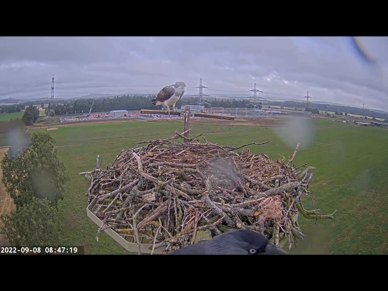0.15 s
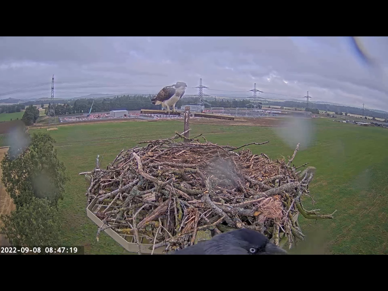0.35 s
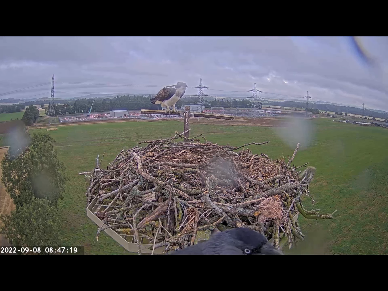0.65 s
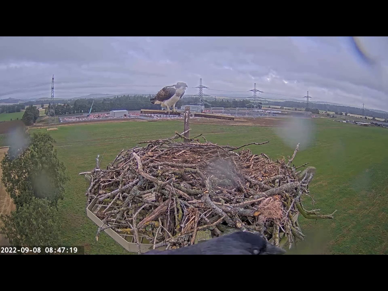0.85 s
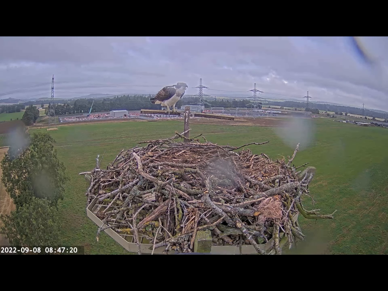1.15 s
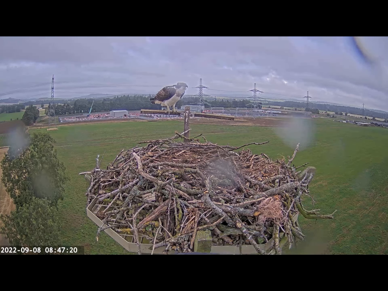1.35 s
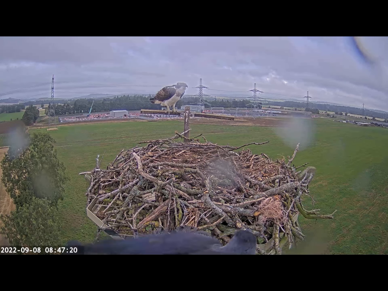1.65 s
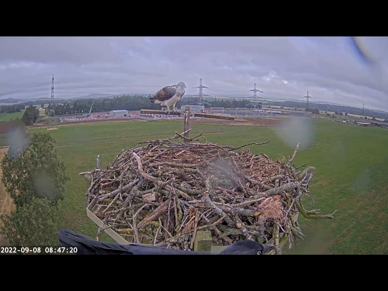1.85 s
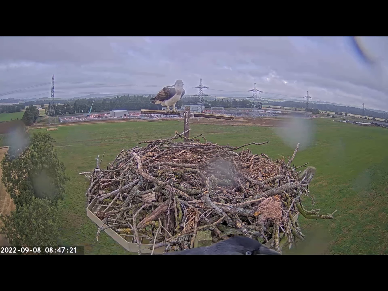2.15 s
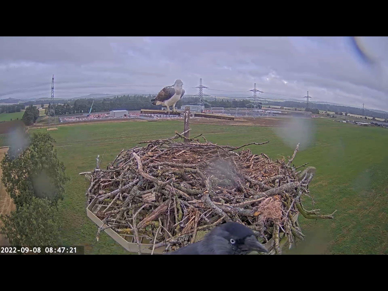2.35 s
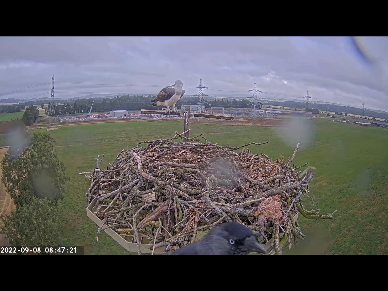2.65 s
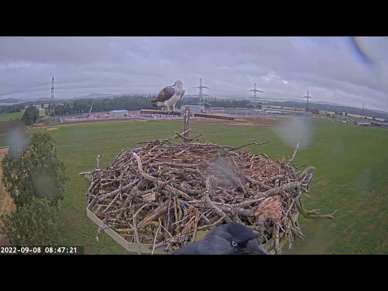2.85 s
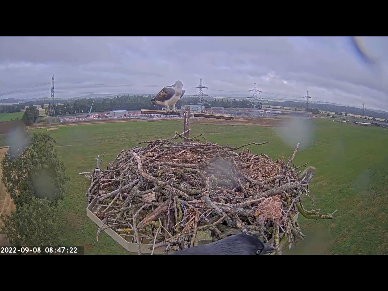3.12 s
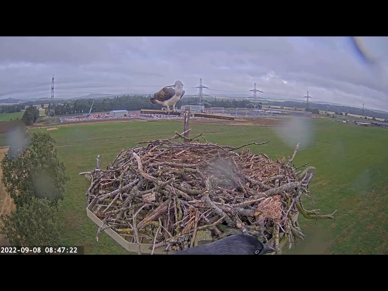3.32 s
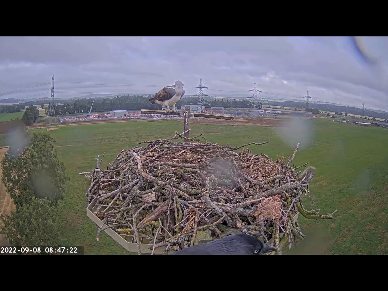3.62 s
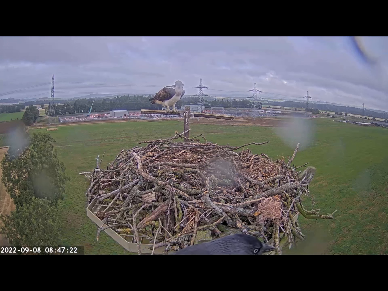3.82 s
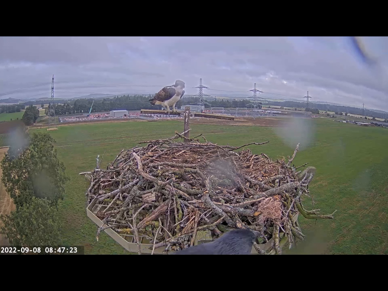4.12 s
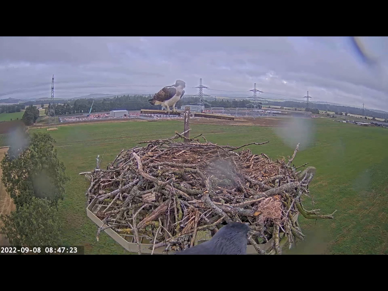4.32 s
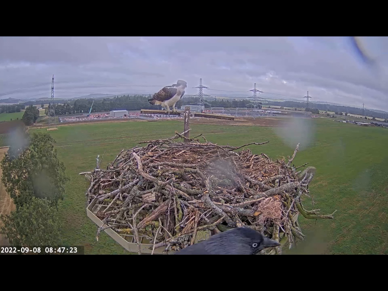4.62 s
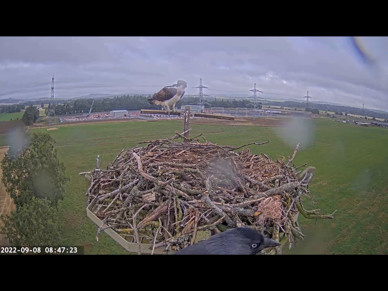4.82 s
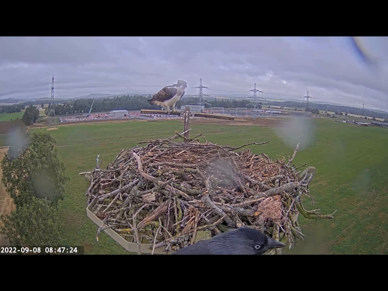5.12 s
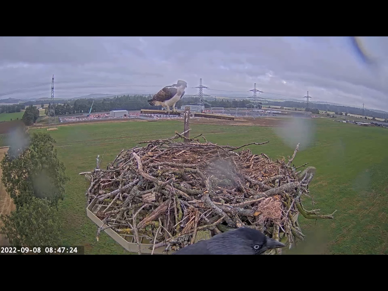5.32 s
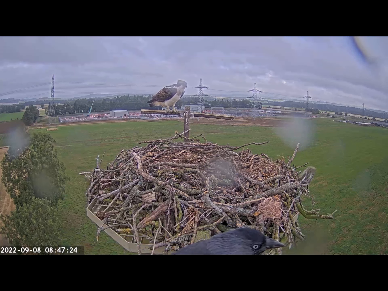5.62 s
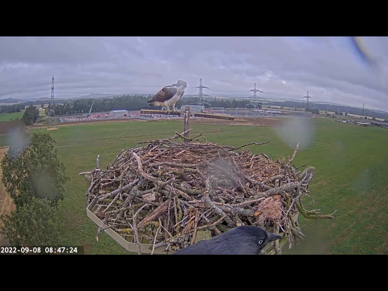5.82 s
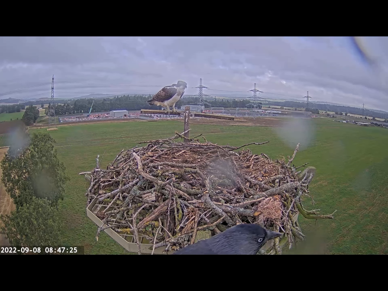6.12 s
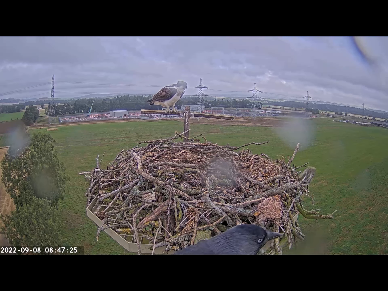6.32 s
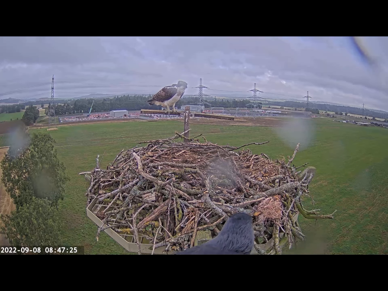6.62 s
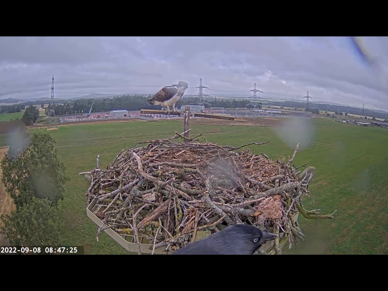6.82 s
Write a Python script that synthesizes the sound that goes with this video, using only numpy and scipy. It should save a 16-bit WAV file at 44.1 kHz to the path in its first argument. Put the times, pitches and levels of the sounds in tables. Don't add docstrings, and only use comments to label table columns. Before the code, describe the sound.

Steady low wind rumble buffets a camera microphone in open air, swelling with slow shoves and hissing faintly through the housing. Over it, a nearby jackdaw gives three widely spaced pairs of very short calls, each a bright, harsh chack followed by a muted lower note. One faint feathery wing stroke follows the first pair, and tiny twig clicks cluster between the second and third.

```python
import sys
import numpy as np
from scipy import signal
from scipy.fft import rfft, irfft, next_fast_len
from scipy.io import wavfile
from scipy.ndimage import uniform_filter1d, minimum_filter1d

SR = 44100
rng = np.random.default_rng(int(sys.argv[2]) if len(sys.argv) > 2 else 0)


def wrap_up_sound(samples):
    columns = np.atleast_2d(samples).T
    tamed = np.clip(columns, -1, 1)
    steps = np.round(tamed * 32767).astype(np.int16)
    wavfile.write(sys.argv[1], SR, steps)


def nominal_scale(level):
    x = np.asarray(level, float) / 20
    return 10 ** x


N = 307136

# (start [s], length [s], first pitch [Hz], sag [Hz/s], effort [dB])
TCHAKS = [
    (0.958, 0.077, 1098, 4255, -24),
    (3.101, 0.072, 1175, 6800, -26),
    (6.669, 0.08, 1234, 7257, -24),
]
# (share of length, effort [dB], beak opening as treble [dB], roughness [0-1])
TCHAK_SHAPE = [
    (0, -6, -5.5, .08),
    (0.111, 0, 0.5, .12),
    (0.339, 0, 0, .13),
    (0.561, -7, 2, .22),
    (.79, -17.5, -3.5, 0.25),
    (.95, -44, -12, 0.15),
]
# (start [s], length [s], pitch [Hz], effort [dB], extra push at the start [dB])
KYOWS = [
    (1.09, .065, 770, -35.5, 11.5),
    (3.259, .069, 832, -33, 1.2),
    (6.897, 0.038, 777, -33, 0.1),
]
# (share of length, share of pitch, effort [dB], beak opening [dB], roughness [0-1])
KYOW_SHAPE = [
    (0, .97, -2, -3.5, .2),
    (0.199, 1.005, 0.7, -3.5, .08),
    (0.468, 1.001, -1.7, -1.5, 0),
    (.67, 0.79, -4, -6.5, .06),
    (.82, 0.66, -15, -5, .08),
    (.999, 0.5, -29.5, -8, .12),
]
# (lowest overtones at the start [dB], at the end [dB], beak opening [dB])
CHEST = [
    (-2, -0.5, -12),
    (0.5, 1, -7),
    (-2.5, -1, -4.5),
    (-13.5, -3, -24.5),
    (-1.5, -3, -19.5),
    (-5, -11, -25),
]
# (time [s], length [s], pitch [Hz], level [dB])
WHISTLES = [
    (1.107, 0.039, 2310, -43.5),
    (3.283, 0.034, 2300, -43.5),
    (6.719, 0.018, 2350, -41.5),
    (6.913, .028, 2100, -57),
    (1.006, .02, 2140, -42),
    (3.14, 0.017, 2476, -49),
]
# (centre [Hz], width [Hz], gain [dB])
THROAT = [(2284, 750, 10), (1710, 230, -3), (2996, 710, -18), (3530, 380, 11.5), (4760, 610, -10),
          (5200, 250, 11.5), (6420, 170, -18.5), (7100, 1000, 6), (8250, 61, -20.5), (8730, 490, -37),
          (9780, 730, -21.5)]
ATTACK_S, RELEASE_S, BEAK_HZ, CHEST_HZ, PUSH_HZ_PER_DB = .0037, .012, 3120, 1790, 2
SHUT_HZ, SHUT_WIDTH_HZ, SHUT_DB = 2074, 130, -18
NEST_DB, NEST_T60_S = -21, .02
ECHO_S, ECHO_DB, ECHO_HZ = .146, -29.5, 4200

# (time [s], hold [s], feather swish [dB], low flap [dB])
WING = [
    (1.722, 0.019, -56, -53),
    (1.754, 0.024, -65.5, -70.5),
    (1.833, 0.028, -74, -69.5),
]
WING_ATTACK_S = (.003, .006, .015)
WING_FADE_DB_PER_S = (708, 112.5, 503)
# (time [s], peak [dB], low body [dB])
TICKS = [(0.4008, -77.5, -3), (0.692, -61, 4.5), (0.8736, -66, 6.5), (2.934, -63, 1), (3.831, -61.5, -1.5),
         (4.1573, -54, -6.5), (4.2786, -61, 2), (4.733, -53.5, -10), (4.751, -65.5, -8.5),
         (4.9105, -52, -4.5), (5.3725, -65.5, -28), (5.8572, -62, -10), (5.881, -60.5, -5),
         (6.0368, -66, 12), (6.196, -71, -8.5)]

# (time [s], peak [dB])
PUFFS = [(0.402, -30.5), (0.478, -26), (0.628, -33), (1.528, -43), (1.64, -34), (2.236, -46), (3.587, -33),
         (4.277, -39), (5.406, -49), (5.898, -30), (6.314, -55), (6.341, -31)]
PUFF_DB, PUFF_RISE_S, PUFF_TAIL_S = 1.5, .0006, .004
# (frequency [Hz], density [dB per Hz])
WIND = [(5, 0.5), (9, 5.5), (16, 2), (28, -6), (43, -8), (97, -18), (270, -30.5), (1000, -45.5),
        (2000, -55), (3500, -71), (5000, -74.5), (9600, -86), (12000, -101)]
# (time [s], level [dB])
GUST = [(0.0, -50), (0.35, -50.5), (0.73, -52.5), (0.93, -54.5), (1.18, -51), (1.3, -51), (1.74, -51),
        (2.02, -57), (2.27, -56.5), (2.64, -51.5), (2.95, -55.5), (3.16, -56.5), (3.33, -53.5),
        (4.03, -49.5), (5.33, -52.5), (6.05, -51), (6.28, -52), (6.96, -53.5)]
# (time [s], length [s], level [dB])
SHOVES = [(0.071, .06, 4.5), (0.295, 0.35, 6), (0.998, 0.11, 7), (1.425, 0.094, 11.5), (2.538, 0.045, 5),
          (2.813, 0.067, 7.5), (3.24, 0.096, 15.5), (3.513, .1, 11), (4.031, 0.054, 3), (4.506, 0.083, 1.5),
          (4.96, 0.084, 6), (5.457, 0.097, 8), (5.941, .06, 5.5), (6.152, 0.037, 6.5), (6.565, .05, 7),
          (6.795, 0.052, 6.5), (6.96, 0.029, -10.5)]
# (time [s], level [dB])
FACING = [(0, -36.5), (1, -37.5), (2.102, -38.5), (2.7, -32.5), (3.1, -34.5), (3.602, -34), (5, -34),
          (6.96, -39)]
GUST_CENTRES_HZ = [15, 70, 220, 700, 3000]
GUST_FOLLOW = [.4, 0.501, .8, 0.951, 1.201]
SHOVE_FOLLOW = [0.92, 0.18, 0.36, 0.092, 0.0052]
FACING_FOLLOW = [0.18, 1, 0.033, 0.013, .01]
SETTLE_S, CRACKLE_DB, CRACKLE_PER_S = .03, 2.8, 160

# (centre [Hz], width [Hz], gain [dB])
HOUSING = [(1050, 400, 2), (1620, 450, -6), (2150, 400, 4), (2530, 180, -7), (2770, 200, 4), (3500, 250, 2),
           (3850, 200, -8), (4200, 300, 3), (4620, 280, -13), (5180, 300, 5), (5480, 150, -6),
           (5800, 150, -4), (6150, 400, 2), (6700, 200, -3), (7900, 200, -4)]
# (frequency [Hz], step over band rms [dB], margin to neighbours for dropping a band [dB])
CAMERA_STEPS = [(300, -20, -20), (900, -6, -8), (1600, 1.5, -4), (3000, 4.5, -2), (6000, 5.5, -1.5),
                (9600, 5, -2)]
HISS_DB, TOP_HZ = -83, 9600


def level(x, db):
    return x * nominal_scale(db) / np.sqrt(np.mean(x ** 2))


def band(x, lo_hz, hi_hz, order=2):
    return signal.sosfilt(signal.butter(order, [lo_hz, hi_hz], "band", fs=SR, output="sos"), x)


def cavities(x, modes):
    for hz, width_hz, db in modes:
        w, a = 2 * np.pi * hz / SR, nominal_scale(db / 2)
        k = np.sin(w) * width_hz / hz / 2
        x = signal.lfilter([1 + k * a, -2 * np.cos(w), 1 - k * a], [1 + k / a, -2 * np.cos(w), 1 - k / a], x)
    return x


def walk(rate_hz, size):
    k = int(SR / rate_hz)
    held = np.repeat(rng.standard_normal(size // k + 1), k)
    return 1.26 * uniform_filter1d(uniform_filter1d(held, k), k)[:size]


def jackdaw():
    voice = np.zeros(N)
    for (s, hz, db, beak_db, rough), (*chest_db, open_db) in zip(call_curves(), CHEST):
        start, sound = call(np.transpose([s, hz, db, beak_db + open_db, rough]), chest_db)
        voice[start:start + len(sound)] += sound
    voice = cavities(voice + whistles(), THROAT)
    t = np.arange(SR // 8) / SR
    scatter = rng.standard_normal((2, len(t))) * np.exp(-np.log(1000) * t / NEST_T60_S)
    scatter /= np.sqrt(np.sum(scatter ** 2, axis=1, keepdims=True))
    sticks = signal.fftconvolve(voice, scatter[0])[:N]
    bright = signal.lfilter(*signal.butter(1, ECHO_HZ, "high", fs=SR), voice)
    far = signal.fftconvolve(bright, scatter[1])
    echo = np.r_[np.zeros(int(ECHO_S * SR)), far][:N]
    return voice + nominal_scale(NEST_DB) * sticks + nominal_scale(ECHO_DB) * echo


def call_curves():
    share, db, beak_db, rough = np.transpose(TCHAK_SHAPE)
    for s, length, hz, sag, effort_db in TCHAKS:
        yield s + share * length, hz - sag * share * length, effort_db + db, beak_db, rough
    share, pitch, db, beak_db, rough = np.transpose(KYOW_SHAPE)
    for s, length, hz, effort_db, push_db in KYOWS:
        push = push_db * np.clip(1 - share, 0, 1)
        pushed_hz = hz * pitch + PUSH_HZ_PER_DB * push * (share == 0)
        yield s + share * length, pushed_hz, effort_db + db + push, beak_db, rough


def call(rows, chest_db):
    s, *columns = np.transpose(rows)
    t = np.arange(s[0] - ATTACK_S, s[-1], 1 / SR)
    hz, db, beak_db, rough = (np.interp(t, s, c) for c in columns)
    rough = np.clip(rough, 0, 1)
    phase = 2 * np.pi * np.cumsum(hz * (1 + 0.17 * rough * walk(900, len(t)))) / SR
    k = np.arange(1, 19)[:, None]
    shut = beak_db < -17
    treble = 1 / (1 + (BEAK_HZ / (k * hz)) ** 14.0)
    chest = 1 / (1 + (k * hz / CHEST_HZ) ** 34.0)
    treble += 0.51 * np.exp(-((k * hz - 4300) / 700) ** 2) * shut
    overtone_db = beak_db * treble + chest * np.linspace(*chest_db, len(t)) - 2.6 * np.log2(k)
    overtones = nominal_scale(overtone_db) * (k * hz < SR / 4)
    overtones *= nominal_scale(SHUT_DB * np.exp(-((k * hz - SHUT_HZ) / SHUT_WIDTH_HZ) ** 2) * shut)
    overtones *= nominal_scale(3.1 * treble * np.array([walk(130, len(t)) for _ in k]))
    tone = np.sum(overtones * np.sin(k * phase), axis=0) * nominal_scale(5.4 * rough * walk(500, len(t)))
    air = rng.standard_normal(len(t)) * (1 + np.cos(phase))
    breath = band(air, 1100, 3000) + nominal_scale(beak_db + 0.5) * band(air, 4500, 11000)
    onset = np.clip((t - t[0]) / ATTACK_S, 0, 1) ** 2
    release = np.clip((t[-1] - t) / RELEASE_S, 0, 1)
    voiced = tone + 1.3 * rough * breath
    return int(t[0] * SR), voiced * nominal_scale(db + 2.0) * onset * release


def whistles():
    out = np.zeros(N)
    for s, length, hz, db in WHISTLES:
        t = np.arange(int(length * SR)) / SR
        swell = np.sin(np.pi * t / length) ** 0.4 * nominal_scale(db + 2.5 * walk(250, len(t)))
        out[int(s * SR):int(s * SR) + len(t)] = swell * np.sin(2 * np.pi * hz * t)
    return out


def wing():
    t, swish, flap = np.arange(N) / SR, 0, 0
    for (s, hold, swish_db, flap_db), attack, fade in zip(WING, WING_ATTACK_S, WING_FADE_DB_PER_S):
        stroke = np.clip((t - s) / attack, 0, 1) * nominal_scale(-fade * np.clip(t - s - hold, 0, 1))
        swish = swish + nominal_scale(swish_db) * stroke
        flap = flap + nominal_scale(flap_db) * stroke
    grain = rng.standard_normal(N) * nominal_scale(1.6 * walk(120, N))
    feathers = level(band(grain, 4700, 7600), 0) * swish
    thump = level(band(grain, 1500, 3400), 0) * flap
    return cavities(feathers + thump, HOUSING)


def ticks():
    out, t = np.zeros(N), np.arange(SR // 50) / SR
    for s, db, body_db in TICKS:
        snap = rng.standard_normal(len(t)) * np.exp(-t / 0.002)
        snap = band(snap, 2600, 7000) + nominal_scale(body_db) * 2 * band(snap, 900, 3000)
        out[int(s * SR):int(s * SR) + len(t)] += nominal_scale(db + 3) * snap
    return cavities(out, HOUSING)


def puffs():
    out, t = np.zeros(N), np.arange(SR // 20) / SR
    for s, db in PUFFS:
        eddy = rng.standard_normal(len(t)) * np.exp(-t / PUFF_TAIL_S) * (1 - np.exp(-t / PUFF_RISE_S))
        out[int(s * SR):int(s * SR) + len(t)] += nominal_scale(db + PUFF_DB) * band(eddy, 560, 1500)
    return cavities(out, HOUSING)


def wind():
    size = next_fast_len(N)
    f, t = np.fft.rfftfreq(size, 1 / SR) + 1e-3, np.arange(N) / SR
    wind_hz, wind_db = np.transpose(WIND)
    shape = nominal_scale(np.interp(np.log(f), np.log(wind_hz), wind_db))
    noise = rfft(rng.standard_normal(size)) * shape * f ** 2 / (f ** 2 + 2.5 ** 2)
    gust, facing = (np.interp(t, *np.transpose(curve)) for curve in (GUST, FACING))
    shove = sum(db * np.exp(-((t[::64] - s) / length) ** 2) for s, length, db in SHOVES).repeat(64)[:N]
    swings = [curve - curve.mean() for curve in (gust, shove, facing)]
    follows = (GUST_FOLLOW, SHOVE_FOLLOW, FACING_FOLLOW)
    out, throb = np.zeros(N), walk(35, N)
    crackle = CRACKLE_DB * np.clip(walk(CRACKLE_PER_S, N) - .5, 0, 3)
    for octave in np.arange(1, 14, .5):
        part = irfft(noise * np.clip(1 - 2 * abs(np.log2(f) - octave), 0, 1), size)[:N]
        slopes = [np.interp(octave, np.log2(GUST_CENTRES_HZ), row) for row in follows]
        gust_db = sum(slope * swing for slope, swing in zip(slopes, swings))
        throb_db = 1.8 * np.clip((octave - 7.5) / 5.6, 0, 1) * throb
        crackle_db = (8 < octave < 11.6) * crackle
        out += part * nominal_scale(gust_db + throb_db + crackle_db + 1.3 * walk(16, N))
    return level(cavities(out - out[0] * np.exp(-t / SETTLE_S), HOUSING), -22.0)


def camera_rounding(x, size=1024, count=8):
    n, k = np.arange(2 * size), np.arange(size // 2)
    window = np.sin(np.pi * (n[:, None] + .5) / (2 * size))
    basis = np.cos(np.pi / size * np.outer(n + .5 + size / 2, k + .5)) * window
    padded = np.pad(x, (size, 2 * size - len(x) % size), "reflect").reshape(-1, size)
    lines = (np.hstack([padded[:-1], padded[1:]]) @ basis).reshape(len(padded) - 1, -1, count)
    hz = (np.arange(lines.shape[1]) + .5) * count * SR / (2 * size)
    table_hz, *columns = np.transpose(CAMERA_STEPS)
    step_db, drop_db = (np.interp(np.log(hz), np.log(table_hz), c) for c in columns)
    db = 10 * np.log10(np.mean(lines ** 2, axis=2) + 1e-20)
    waver = 4.5 * uniform_filter1d(rng.standard_normal(db.shape), size=2, axis=0)
    kept = db - uniform_filter1d(db, size=5, axis=1) + waver > drop_db
    finer_db = .25 * np.clip(db - np.median(db, axis=0) - 10, 0, 40)
    step = nominal_scale(db + step_db - finer_db)[..., None]
    rounded = np.round(lines / step) * step * kept[..., None]
    blocks = rounded.reshape(len(lines), -1) @ basis.T * 2 / size
    return (blocks[1:, :size] + blocks[:-1, size:]).ravel()[:len(x)]


def steady(x, size, jump_db):
    power = x ** 2
    ahead = uniform_filter1d(power, size=size, origin=-size // 2)
    return ahead < nominal_scale(jump_db) * uniform_filter1d(power, size=2000, origin=999)


def scene():
    return (jackdaw() + wing() + ticks() + puffs() + wind())[None]


def top_cut(x):
    return signal.sosfilt(signal.butter(12, 9770, fs=SR, output="sos"), x)


def record(dry):
    x = dry[0] + nominal_scale(HISS_DB) * rng.standard_normal(N)
    x = signal.sosfilt(signal.ellip(10, .3, 70, TOP_HZ, fs=SR, output="sos"), x)
    calm = steady(band(x, 3000, 9000), 80, 16) & steady(band(x, 600, 2000), 160, 17)
    calm = uniform_filter1d(minimum_filter1d(1. * calm, size=1100, origin=-250), size=200)
    x = calm * camera_rounding(calm * x) + (1 - calm ** 2) * x
    mix = x[None] + nominal_scale(-108) * rng.standard_normal(dry.shape)
    return top_cut(mix)


dry = scene()
out = record(dry)
wrap_up_sound(out)
```